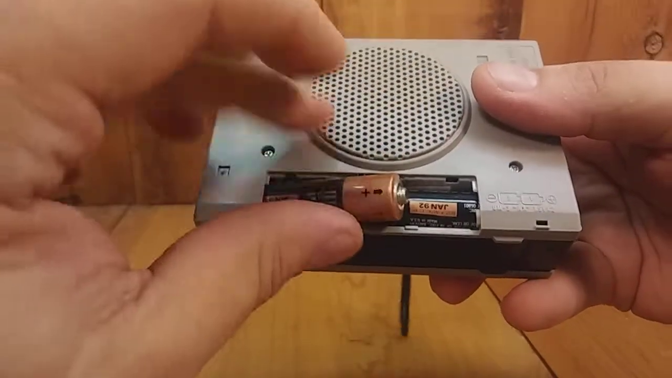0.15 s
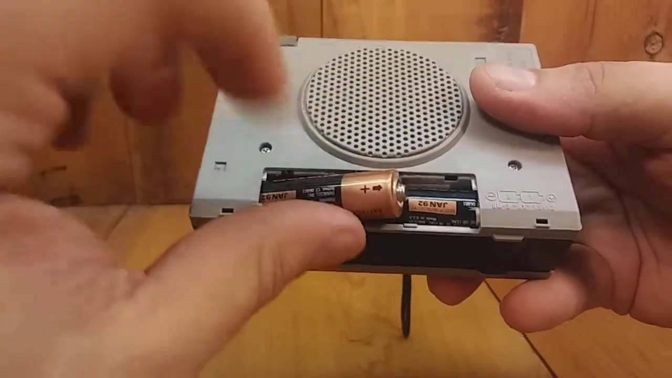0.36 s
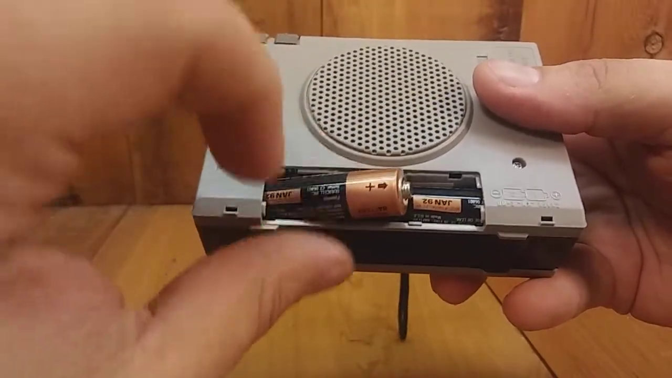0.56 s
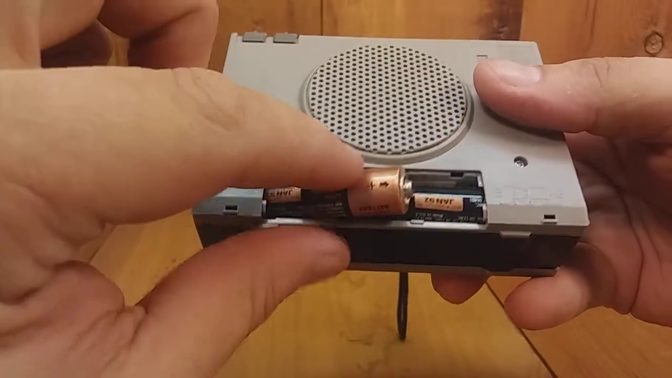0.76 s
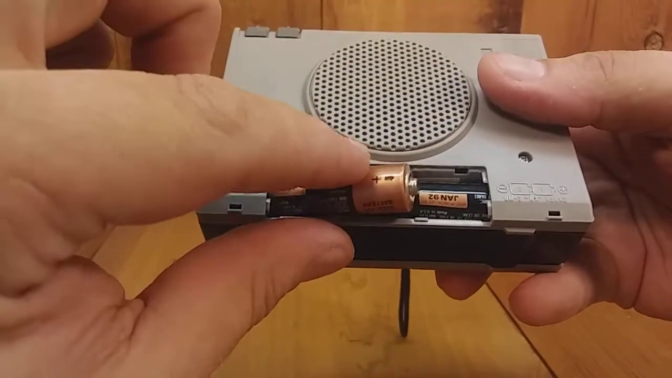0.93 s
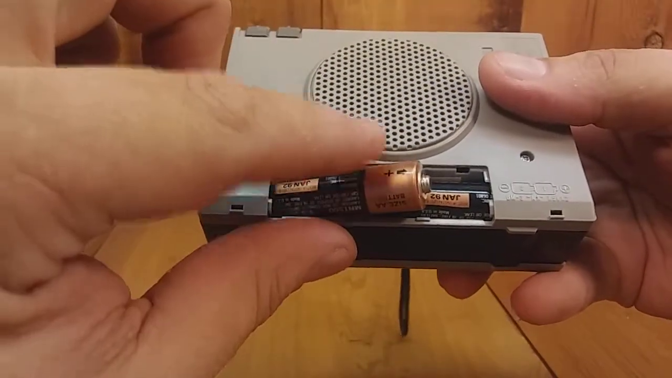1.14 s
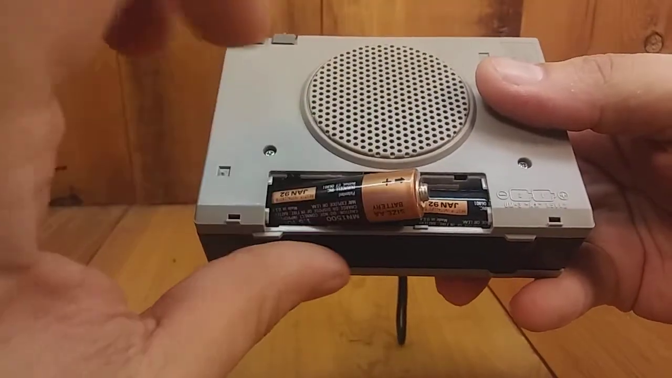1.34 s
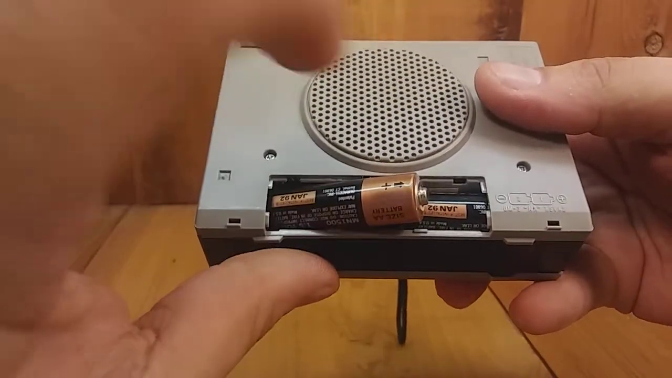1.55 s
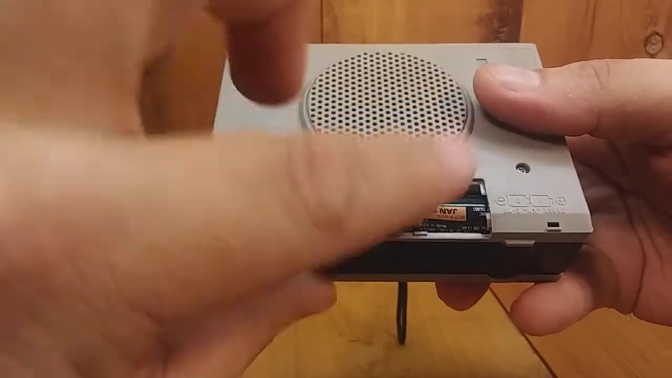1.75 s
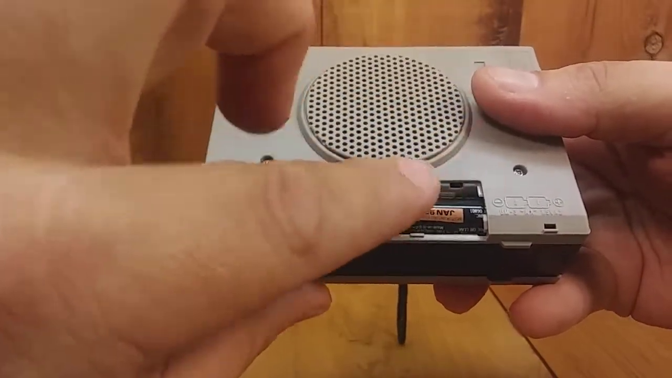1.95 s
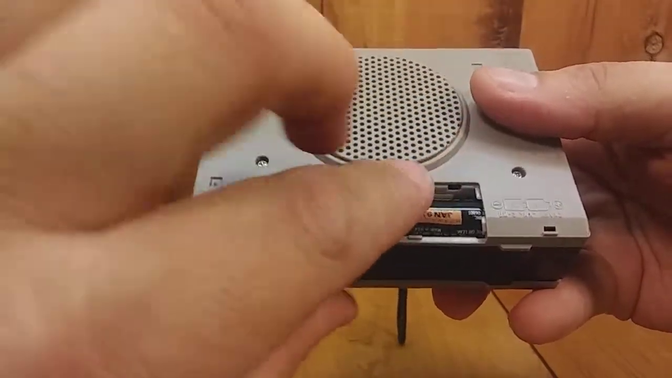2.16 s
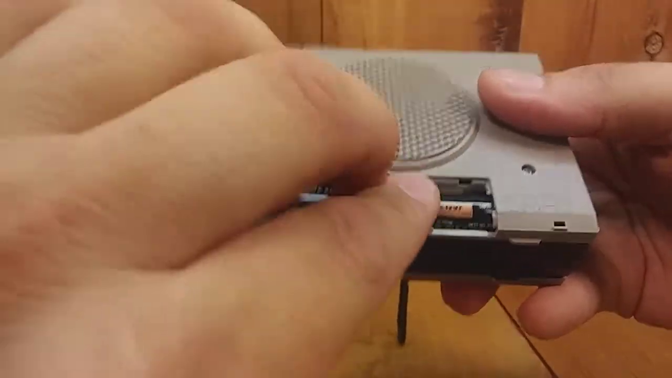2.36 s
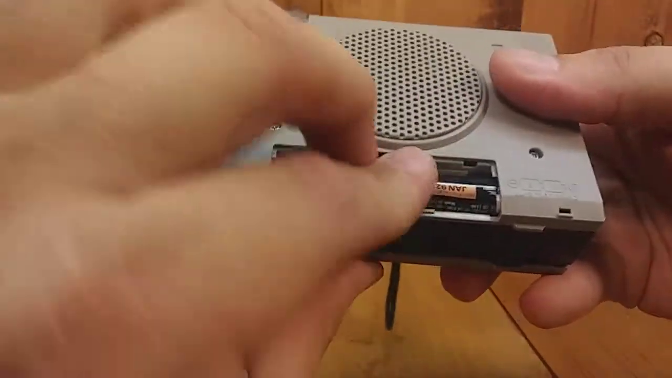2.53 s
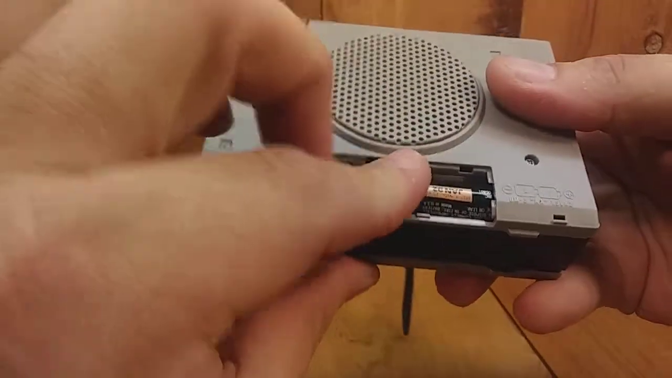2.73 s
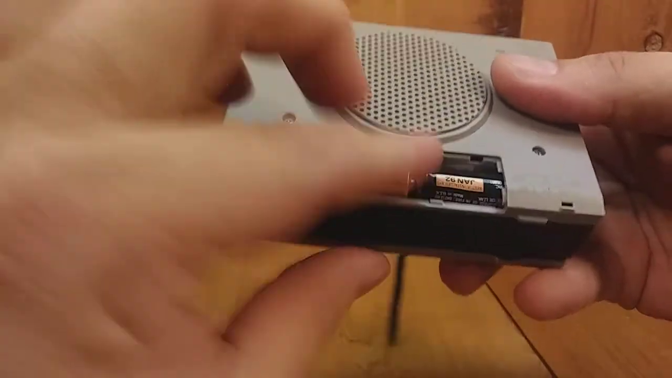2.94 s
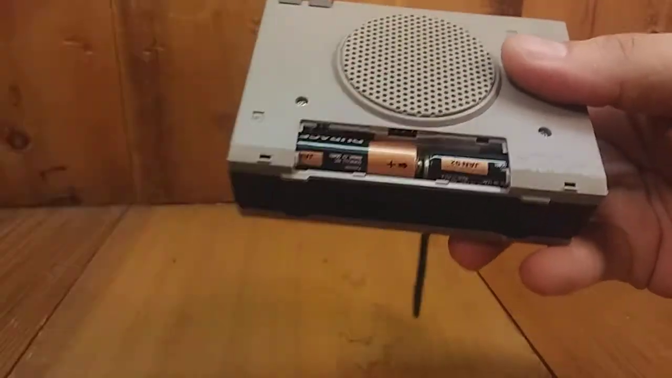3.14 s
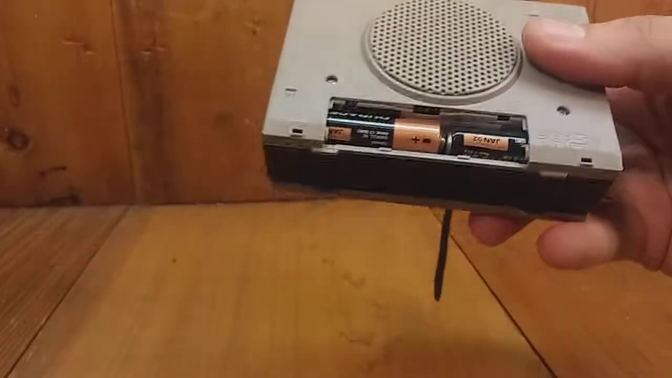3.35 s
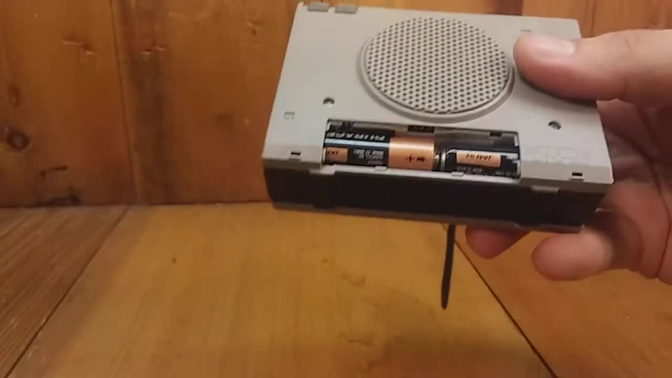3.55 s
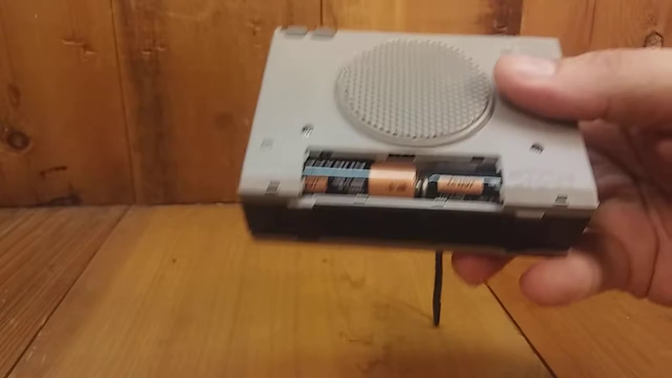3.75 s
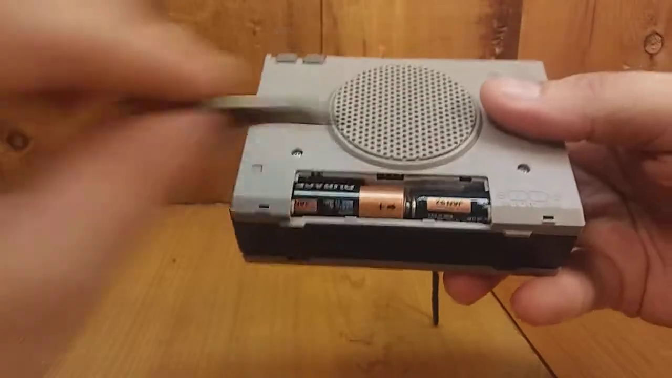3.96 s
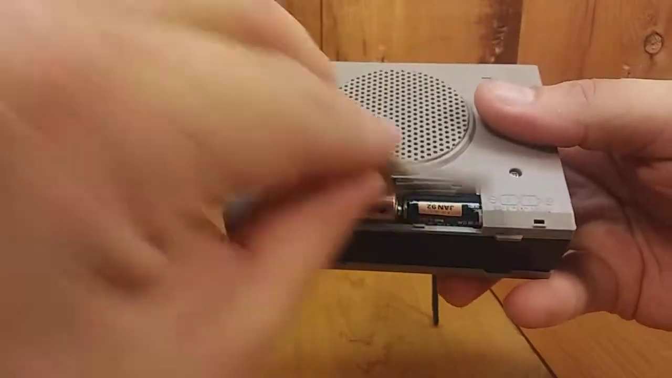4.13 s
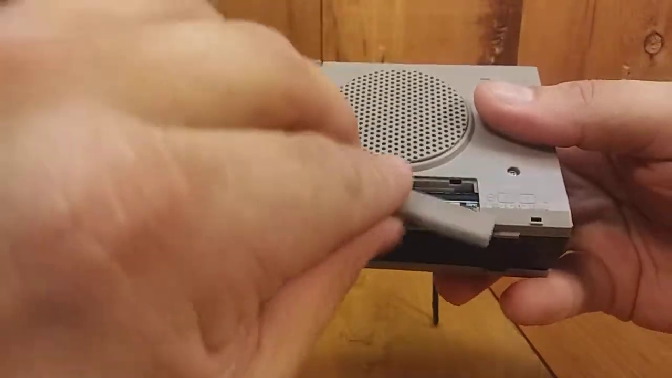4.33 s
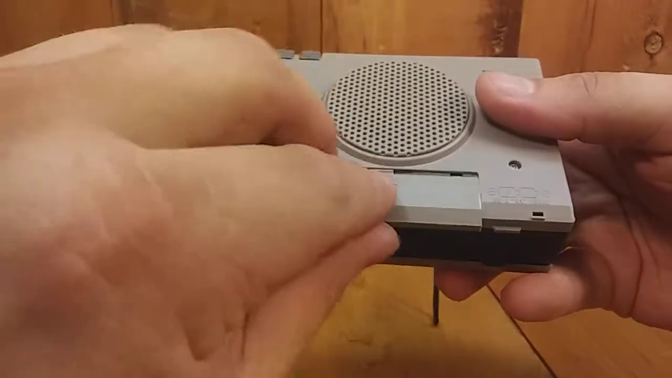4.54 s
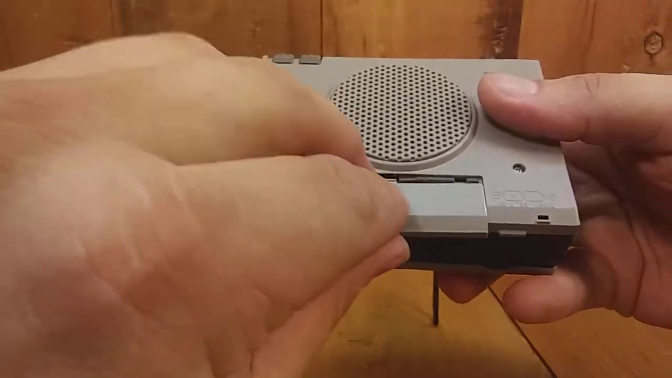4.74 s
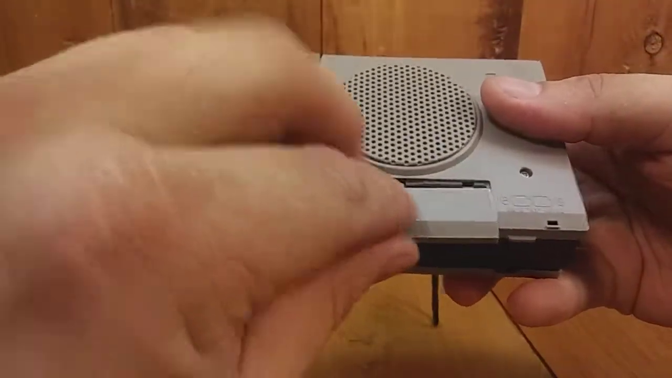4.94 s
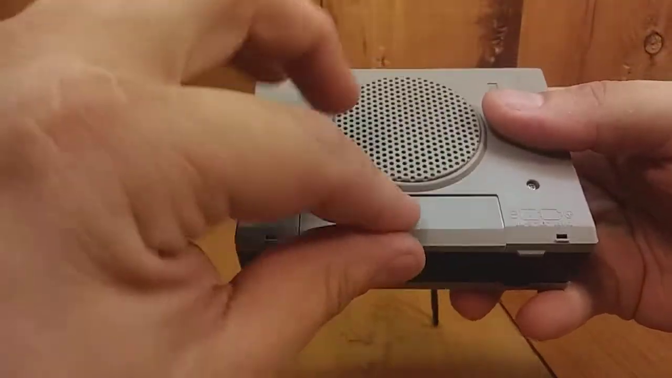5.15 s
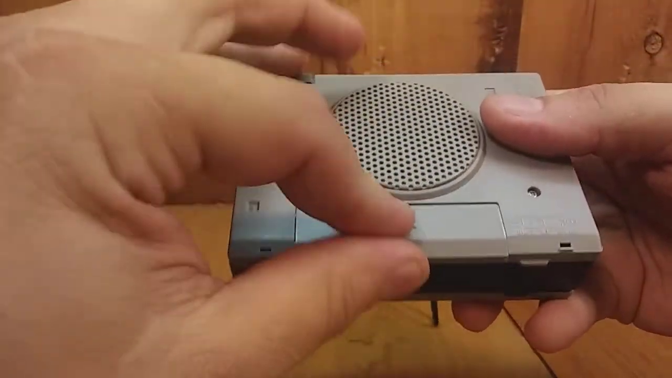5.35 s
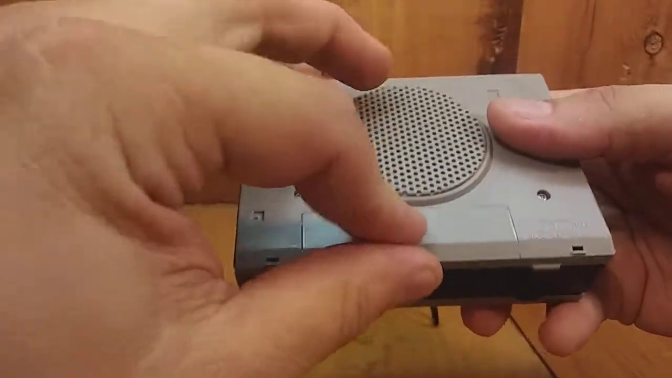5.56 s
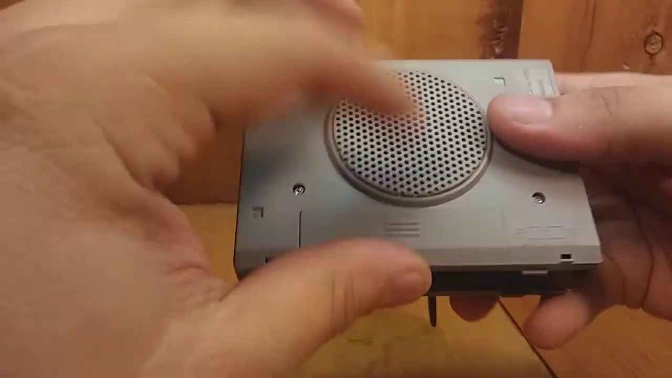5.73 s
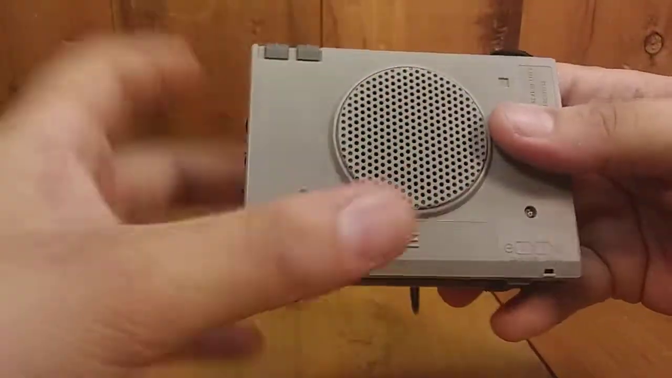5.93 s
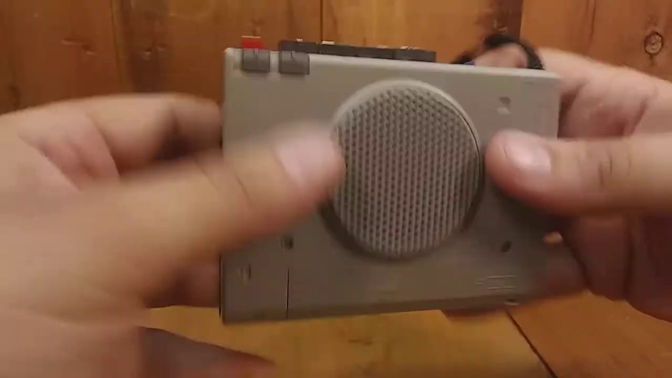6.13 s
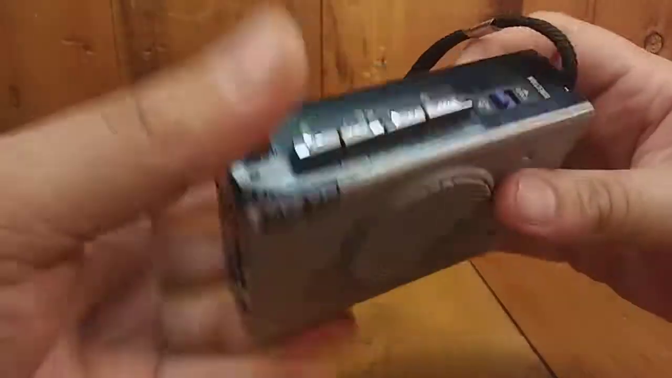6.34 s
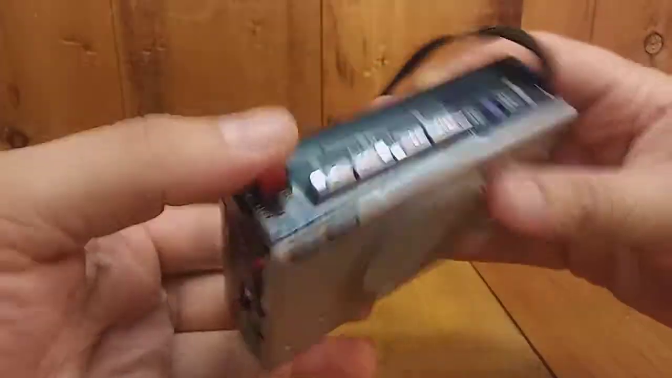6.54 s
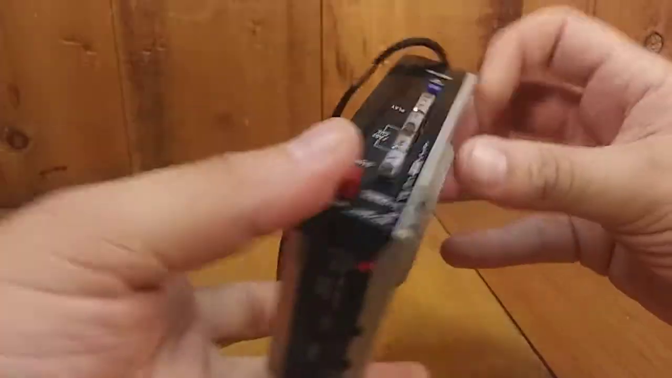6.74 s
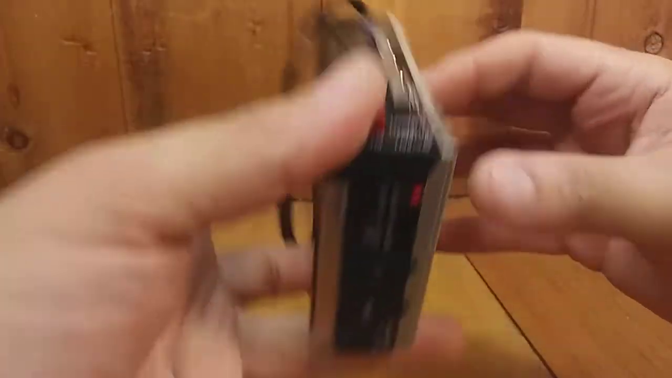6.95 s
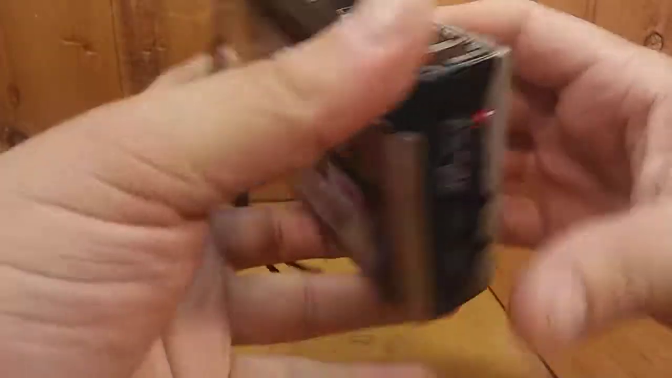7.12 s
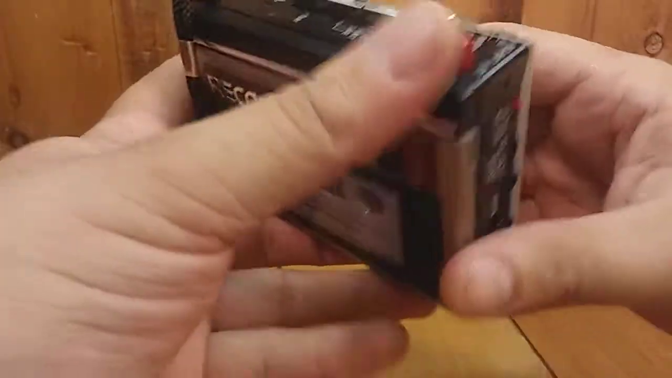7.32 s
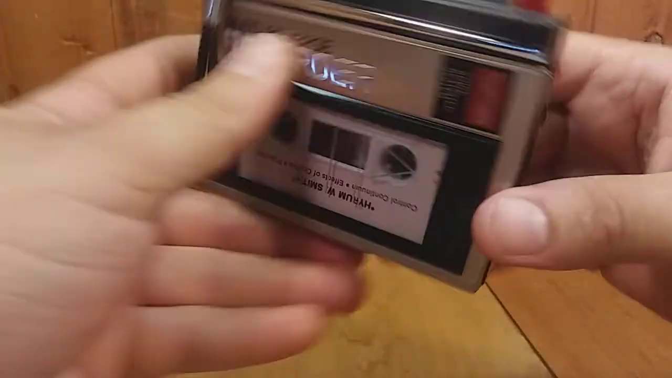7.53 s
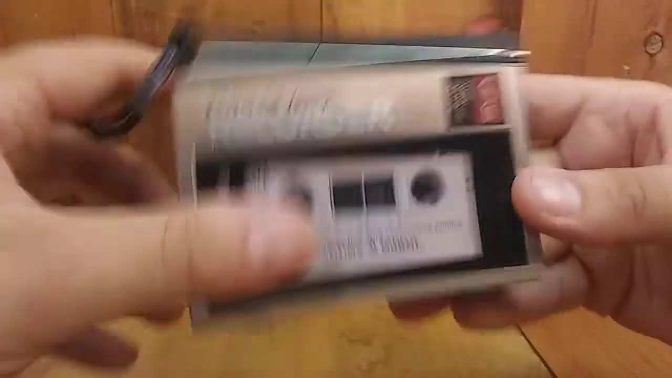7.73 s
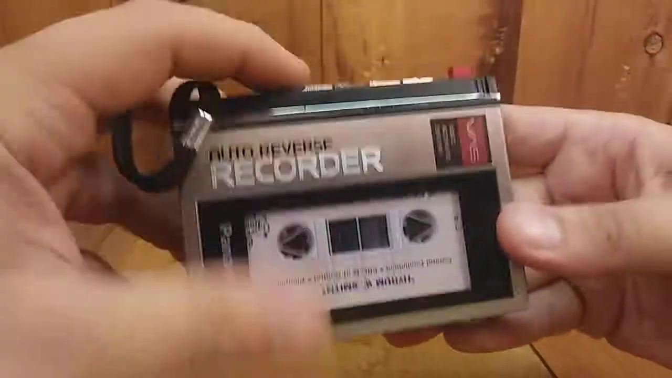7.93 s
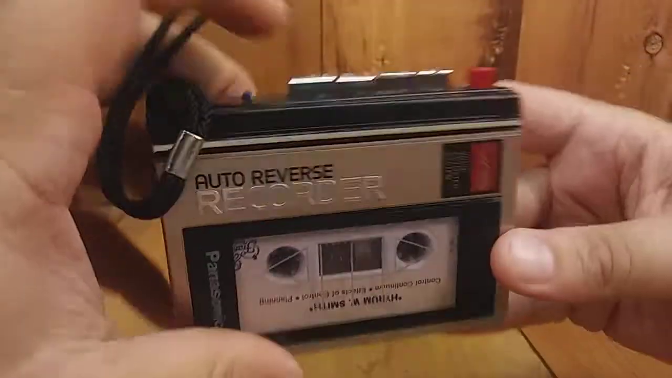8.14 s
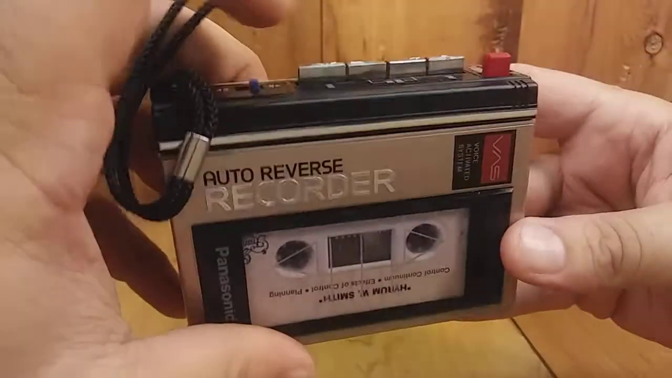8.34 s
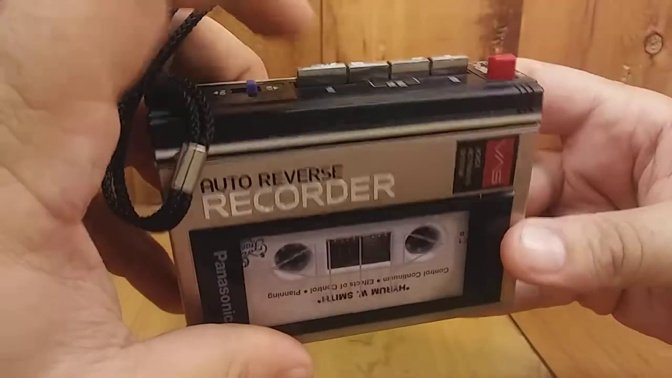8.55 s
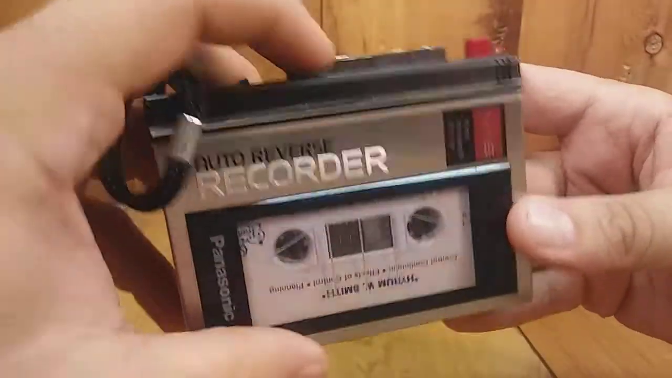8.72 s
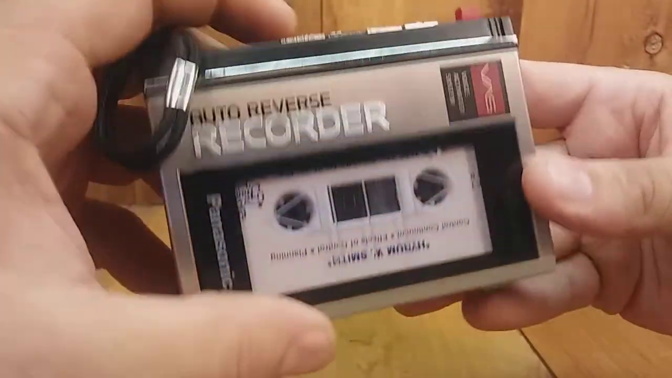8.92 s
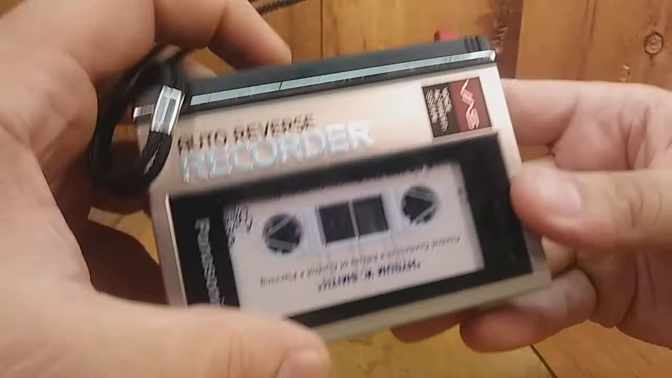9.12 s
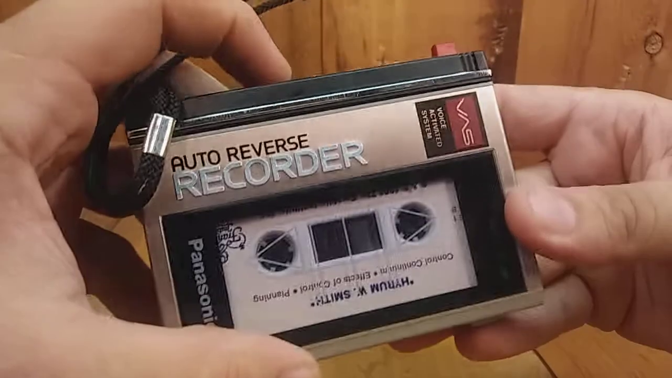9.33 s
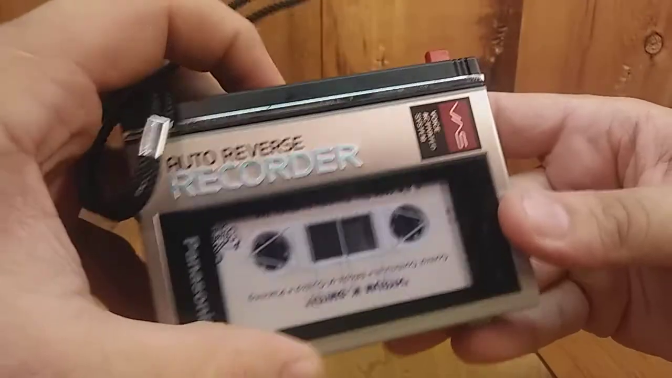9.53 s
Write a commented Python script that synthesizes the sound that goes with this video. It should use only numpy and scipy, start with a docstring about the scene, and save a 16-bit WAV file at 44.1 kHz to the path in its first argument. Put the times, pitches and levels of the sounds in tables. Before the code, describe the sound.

Batteries click into a small plastic tape recorder, a lid snaps shut, then handling taps and scuffs follow over faint hum and whine.

```python
"""Close up in a small wooden room, hands press cells into the battery bay of a small plastic tape
recorder, snap the lid on, then turn the case over. Clicks and knocks ring the shell from the start;
from about 3 s jolts thump it, and lighter taps and finger scuffs fill the last seconds.
Throughout, the room hums faintly and a thin electric whine switches on and off 60 times a second."""
import sys
import numpy as np
from scipy import signal
from scipy.fft import rfft, irfft, next_fast_len
from scipy.io import wavfile
from scipy.ndimage import map_coordinates

SR = 44100
rng = np.random.default_rng(int(sys.argv[2]) if len(sys.argv) > 2 else 0)


def wrap_up_sound(samples):
    """Save the sound to the file named by the first command line argument, as 16-bit audio."""
    columns = np.atleast_2d(samples).T
    # keep every value between -1 and 1, then stretch to whole-number steps
    tamed = np.clip(columns, -1, 1)
    steps = np.round(tamed * 32767).astype(np.int16)
    wavfile.write(sys.argv[1], SR, steps)


N = 422478

# Blows: start_s, thud_db, knock_db, click_db, sizzle_db, low_ring_hz, high_ring_hz, crack_db, t60_ms
CONTACTS = [(0.0, -42.5, -40.5, -39, -55, 826, 5720, 0, 70), (0.019, -67, -48, -41, -60, 1220, 2480, 7, 33),
            (0.0278, -65, -48, -50, -68, 820, 6270, 0, 30),
            (0.746, -55.5, -51.5, -53, -85, 650, 2200, 0, 110),
            (1.789, -47, -47, -66, -68, 1660, 6980, -2, 40),
            (1.807, -49, -44.5, -45.5, -46, 1820, 6450, -6, 107),
            (1.8618, -52, -49, -55, -60, 1000, 5600, 11, 71),
            (1.933, -66, -64, -59, -69, 1760, 2480, 6, 45),
            (2.0173, -58, -47.5, -61, -65, 990, 2120, 4, 53),
            (2.129, -64, -63, -56, -66, 1000, 3000, 0, 30),
            (2.1468, -39, -35.5, -37, -44.5, 1770, 2550, 8, 74),
            (2.1868, -49, -48, -49, -57, 1630, 5490, -12, 51),
            (2.191, -43, -30.5, -24.5, -36, 1650, 5320, 10.5, 62),
            (2.318, -46, -46.5, -39, -44.5, 990, 6520, 11, 45),
            (2.4477, -63, -50.5, -44, -65, 825, 3000, 13, 42),
            (2.5935, -56.5, -46, -60, -70, 1250, 2020, 9, 48),
            (2.765, -60, -55, -62, -70, 1440, 2310, -10, 45),
            (3.0662, -23, -30, -28, -22.5, 1130, 6800, -17, 60),
            (3.0699, -31, -24, -29, -27.5, 1090, 7200, -14, 19),
            (3.4977, -38, -41, -30, -50, 1310, 3440, -2, 45),
            (3.5006, -30, -38, -20.5, -33, 1310, 5100, -9, 35),
            (3.5041, -32.5, -28.5, -25, -32, 1660, 5000, -1, 65),
            (3.5335, -49, -27.5, -39, -48, 1550, 5490, -17, 38),
            (3.6207, -49, -57, -44, -58, 1000, 6700, 0, 43),
            (4.1528, -51, -39, -31.5, -34.5, 2230, 2870, -1, 70),
            (4.234, -65, -47, -49, -66, 1450, 3070, 4, 45), (4.353, -56, -51, -38, -78, 1410, 3130, 11, 52),
            (4.4083, -71, -38, -30, -50, 1210, 6090, -12, 44),
            (4.41, -63, -38, -32, -32.5, 1230, 6090, 3, 43),
            (4.4249, -51, -46, -38, -56, 1820, 3490, 10, 37),
            (4.4537, -65, -38.5, -34, -40, 1910, 2500, 6, 66),
            (4.4668, -66, -44, -45, -56, 1820, 2380, -1, 45),
            (4.4908, -56, -47, -40, -61, 1840, 2350, 4, 33),
            (5.0818, -59, -57, -41, -66, 1100, 6300, 5, 66),
            (5.0891, -42, -35.5, -24, -39.5, 1084, 5750, 10.5, 55),
            (5.1414, -47.5, -43.5, -52.5, -59, 806, 2480, 12, 65),
            (5.2804, -59, -48.5, -54, -57, 990, 1990, 1, 59),
            (5.349, -56, -55, -43, -61, 1700, 3930, 7, 45),
            (5.3791, -55, -49.5, -45, -64, 1790, 3570, 10, 45),
            (5.4131, -62, -28.5, -20, -49, 1120, 5100, -10, 34),
            (5.4175, -40, -30, -16, -17.5, 1110, 5700, 10, 21),
            (5.4214, -62, -29, -18, -30, 1800, 3500, 9.5, 40),
            (5.4246, -40, -31, -16, -39, 800, 6140, -9, 27), (5.596, -68, -54, -62, -70, 950, 2600, 6, 45),
            (5.6223, -67, -52, -51, -52, 990, 6150, 7, 34), (5.6494, -53, -42, -43, -69, 960, 3820, 13, 47),
            (5.7353, -44.5, -43.5, -55, -61, 1030, 3790, 11, 44),
            (5.7929, -58, -67, -58, -61, 990, 6090, 8, 52), (5.99, -57, -58, -55, -66, 970, 2210, -5, 45),
            (6.1798, -49.5, -45, -48.5, -56, 1120, 2410, 6, 87),
            (6.3802, -61, -53, -53, -70, 1220, 2680, -3, 45),
            (6.457, -49, -44, -56, -63, 1450, 2900, 12, 47), (6.514, -56, -46, -51, -67, 1440, 4910, 2, 66),
            (6.5261, -51, -33, -28.5, -35, 1430, 4660, 8.5, 45),
            (6.731, -68, -51, -69, -70, 1450, 1980, 10, 45),
            (6.795, -53, -45, -55, -55, 1843, 1890, 10, 53),
            (7.147, -47, -39.5, -48, -67, 1420, 5310, 7.5, 67),
            (7.153, -45.5, -54, -40.5, -54, 980, 2470, 7, 54),
            (7.2518, -50, -37.5, -43.5, -50, 1300, 2140, 9, 48),
            (7.435, -60, -53, -64, -60, 1410, 2510, 2, 49),
            (7.5435, -73, -49.5, -47, -66, 1110, 2350, -2, 41),
            (7.6611, -62, -42, -42, -38, 1410, 5500, -9, 77),
            (7.7494, -67, -50, -52, -66, 1440, 2580, 4, 45),
            (7.8006, -57, -50.5, -50, -51, 1410, 6030, 6, 44),
            (7.9861, -56, -43, -32, -43, 1120, 3320, 7.5, 43),
            (8.733, -73, -52.5, -49, -66, 1870, 2200, 12, 53),
            (8.8665, -58, -42, -31.5, -48.5, 1840, 3240, 7.5, 75),
            (9.141, -76, -49, -59, -68, 1660, 2430, 0, 45), (9.2447, -53, -43, -54, -72, 1410, 2360, 5, 45),
            (9.3042, -57, -42, -54, -55, 1460, 5760, -3, 45),
            (9.3165, -60, -39, -33.5, -45, 1440, 7010, 1, 63),
            (9.3284, -45, -43, -43, -40, 1440, 6030, 1, 40),
            (9.3479, -47, -30.5, -41, -50, 1420, 2400, 6, 61),
            (9.3513, -42, -29, -31, -47, 1500, 2380, 4, 58),
            (9.357, -40.5, -38, -29, -29.5, 1870, 6500, 4, 64),
            (9.5133, -51.5, -53, -61, -70, 970, 6960, 7, 51),
            (9.5643, -53, -52, -44.5, -75, 1300, 2420, -3, 63),
            (9.574, -57, -47, -55, -68, 1290, 2430, 2, 45)]
# Centres of thud, knock, click, sizzle: centre_hz
PARTS_HZ = [600, 1700, 4400, 11300]
# Contact bands: low_hz, high_hz
CONTACT_BANDS = [(150, 450), (450, 900), (900, 1800), (1800, 2800), (2800, 4200), (4200, 8000),
                 (8000, 16000)]
# Room decay per contact band: t60_s
ROOM_T60_S = [0.47, 0.24, 0.16, 0.17, 0.18, 0.18, 0.15]


def contacts():
    """Each blow sends a crack and a short rattle through the shell; the room decays band by band."""
    bass_fall_db_per_oct, plastic_cutoff_hz = 9.9, 14900
    out, t = np.zeros(N + SR), np.arange(SR // 3) / SR
    filters, band_oct = bandpasses(CONTACT_BANDS), octaves(CONTACT_BANDS)
    echo_onset = np.clip(t / 0.0018, 0, 1)
    for start_s, *parts_db, low_ring_hz, high_ring_hz, crack_db, t60_ms in CONTACTS:
        levels_db = np.interp(band_oct, np.log2(PARTS_HZ), parts_db)
        levels_db -= bass_fall_db_per_oct * np.clip(np.log2(PARTS_HZ[0]) - band_oct, 0, None)
        rattle = amp(-0.5 - 60 * 1000 * t / t60_ms) * (1 - np.exp(-t / 0.00043))
        crack = amp(crack_db - 60 * t / 0.004)
        lift_db = rng.normal(0, 1.0, len(SHELL_MODES))
        lift_db += mode_lift(low_ring_hz, 9.0) + mode_lift(high_ring_hz, 5.5)
        near, far = rng.standard_normal((2, len(t)))
        bumps = amp(2.3 * np.repeat(rng.standard_normal(len(t) // 30), 30))  # loose parts and walls
        near, far = unit(near * bumps), unit(far * bumps[::-1])
        near[:44] = unit(near[:44])  # first 1 ms at full strength
        blow = 0
        for sos, db, room_t60_s, (low_hz, _) in zip(filters, levels_db, ROOM_T60_S, CONTACT_BANDS):
            direct = near * (rattle + crack * np.clip(low_hz / 2600, 0, 1))
            echo = far * echo_onset * amp(-9.0 - 60 * t / room_t60_s)
            band_rms = np.std(signal.sosfilt(sos, far))
            blow += amp(db) / band_rms * signal.sosfilt(sos, direct + echo)
        rung = filtered(blow, lambda hz: shell(hz, -4.0, lift_db) / (1 + 1j * hz / plastic_cutoff_hz)**2)
        out[round(start_s * SR):][:len(t)] += rung
    return out[:N]


# Shell resonances: mode_hz, width_hz, gain_db
SHELL_MODES = [(242, 140, -14), (263, 170, -13), (447, 210, -4), (710, 27, -15), (804, 46, 1),
               (1009, 23, 6), (1110, 70, 1), (1270, 44, -1), (1408, 107, -1.5), (1682, 29, -9),
               (1940, 86, -10), (2207, 132, -1.5), (2434, 68, -4.5), (2653, 95, -15), (3140, 56, -7),
               (3440, 114, 0), (3725, 57, -3), (5000, 420, -6.5), (5650, 910, -1), (6100, 310, 0.5),
               (6560, 210, -2), (7070, 300, 0.5), (11320, 230, -1)]


def shell(hz, flat_db, lift_db):
    """Response of the thin shell: it radiates everything a little and its modes more."""
    modes = (amp(db + lift) * 1j * hz * width_hz / (mode_hz**2 - hz**2 + 1j * hz * width_hz)
             for (mode_hz, width_hz, db), lift in zip(SHELL_MODES, lift_db))
    return amp(flat_db) + sum(modes)


def mode_lift(ring_hz, target_db):
    """Lift in dB per mode: the place of a touch pulls modes near one pitch toward one level."""
    mode_hz, _, gain_db = np.transpose(SHELL_MODES)
    return (target_db - gain_db) * np.exp(-(np.log(mode_hz / ring_hz) / 0.07) ** 2)


# Jolts: start_s, level_db, pitch_hz, t60_s
THUMPS = [(3.068, -28, 250, .13), (3.429, -51, 109, .15), (3.511, -45, 360, 0.14), (3.621, -47, 360, .08),
          (5.416, -44, 109, 0.024), (5.42, -43, 352, .08), (6.513, -54.5, 280, 0.053),
          (6.535, -48, 290, .06), (6.922, -48.5, 332, .08)]


def thumps():
    """A jolt of the whole case pushes out low noise around one pitch; the room booms after it."""
    out, t = np.zeros(N + SR), np.arange(SR // 3) / SR
    for start_s, level_db, pitch_hz, t60_s in THUMPS:
        sos, = bandpasses([(0.59 * pitch_hz, 1.5 * pitch_hz)])
        push = rng.standard_normal(len(t))
        decay = amp(-60 * t / t60_s) + amp(-10 - 60 * t / ROOM_T60_S[0])
        gain = amp(level_db) / np.std(signal.sosfilt(sos, push))
        out[round(start_s * SR):][:len(t)] += gain * signal.sosfilt(sos, push * decay)
    return out[:N]


# Slides of skin and plastic: start_s, length_s, level_db, tilt_db_per_oct, ring_hz
SCUFFS = [(0, 0.05, -55, 2.5, 2450), (2.301, 0.026, -42.5, 3, 2210), (3.145, 0.097, -52.5, -3, 980),
          (3.4, 0.046, -70, -6, 1020), (3.454, 0.058, -58, -2, 1020), (3.613, 0.037, -55, 2, 6640),
          (4.227, 0.094, -64, 3.5, 2620), (4.292, 0.045, -59.5, 4.5, 2650), (4.428, 0.041, -50, 2.5, 5350),
          (4.459, 0.046, -50.5, 0.5, 2460), (5.055, 0.037, -54.5, 1, 6680), (5.59, 0.028, -68, 0, 2490),
          (5.62, 0.027, -53.5, 1.5, 6260), (5.724, 0.02, -56.5, 3, 1030), (6.14, 0.04, -58.5, 6, 1430),
          (6.408, 0.036, -62, -1, 790), (6.537, 0.058, -56.5, 3, 3780), (6.897, 0.05, -67, -4, 770),
          (6.936, 0.06, -64, 3, 2450), (7.032, 0.035, -68, 0, 1590), (7.094, 0.075, -60.5, 0.5, 1010),
          (7.204, 0.038, -63, -1, 1000), (7.32, 0.11, -59, 2, 2540), (7.42, 0.05, -59, 2, 1360),
          (7.508, 0.055, -63, 3.5, 2350), (7.589, 0.11, -60.5, 1, 1420), (7.66, 0.06, -52.5, 2, 5400),
          (7.742, 0.052, -60.5, -1.5, 6900), (7.956, 0.031, -66, -1, 3350), (9.127, 0.033, -65, -2, 2430),
          (9.296, 0.036, -50.5, -0.5, 1460), (9.319, 0.025, -47, 4, 1430), (9.5, 0.056, -64, -2, 970)]
# Scuff bands: low_hz, high_hz
SCUFF_BANDS = [(150, 900), (900, 2800), (2800, 8000), (8000, 16000)]
# Colour per scuff band: offset_db
SCUFF_COLOUR_DB = [-4, 0.5, -4, -16.5]


def scuffs():
    """A sliding touch swells and fades as it sticks and slips, ringing the shell's modes."""
    out, slips = np.zeros(N), unit(amp(1.96 * wobble(90) + 2.4 * wobble(500)))
    filters, band_oct = bandpasses(SCUFF_BANDS), octaves(SCUFF_BANDS)
    for start_s, length_s, level_db, tilt_db_per_oct, ring_hz in SCUFFS:
        levels_db = level_db + tilt_db_per_oct * (band_oct - band_oct[1]) + SCUFF_COLOUR_DB
        first = round(start_s * SR)
        t = np.arange(round(length_s * SR) + SR // 12) / SR
        swell = np.sin(np.pi * np.clip(t / length_s, 0, 1)) ** 1.15 * np.resize(slips[first:], len(t))
        swell += amp(-6.5) * signal.lfilter([.0012], [1, -.9988], swell)  # room tail
        grain = rng.standard_normal(SR // 4)
        friction = sum(amp(db) * unit(signal.sosfilt(sos, grain))[-len(t):]
                       for sos, db in zip(filters, levels_db))
        lift_db = rng.normal(0, 4.4, len(SHELL_MODES)) + mode_lift(ring_hz, 9.0)
        rung = filtered(friction * swell, lambda hz: shell(hz, -5.0, lift_db))
        out[first:first + len(t)] += rung[:N - first]
    return out


# Grip shifts, one list each: time_s, relative_db
GRIP_SHIFTS = [
    [(1.7, -52), (2.238, -69), (2.296, -60), (2.8, -73)],
    [(4.15, -57), (4.34, -48.5), (4.65, -61)],
    [(4.95, -74), (5.41, -57), (5.95, -61), (6.46, -54.5), (6.6, -58), (7.29, -50.5), (7.45, -50),
     (7.61, -52.5), (8.1, -63)],
    [(9.256, -73), (9.45, -55), (9.58, -60)],
]
# Skin friction spectrum: freq_hz, density_db
SKIN_SPECTRUM = [(300, -6.5), (1000, -3), (1500, -6), (2400, -4), (4000, -6.5), (7000, -15.5), (9000, -18),
                 (15000, -19)]


def grip_rub():
    """The holding hand shifts and rustles faintly on the shell."""
    points = []
    for shift in GRIP_SHIFTS:
        points += [(shift[0][0] - .05, -90), *shift, (shift[-1][0] + .05, -90)]
    friction = unit(amp(2.7 * wobble(25)) * noise(SKIN_SPECTRUM))
    rustle = amp(curve(points) - 8.5) * friction
    return filtered(rustle, lambda hz: shell(hz, -4.5, np.full(len(SHELL_MODES), -1.5)))


def whine():
    """Each electric switching cycle: a sharp blip, a tone of slightly new pitch and phase, a rest."""
    switch_hz, tone_hz, blip_hz = 59.9975, 7650, 6800
    turns = np.arange(N) / SR * switch_hz - .118
    cycle = np.floor(turns).astype(int) + 1
    age_s = turns % 1 / switch_hz
    kick, drift = rng.standard_normal((cycle.max() + 1, 2))[cycle].T
    phase = 2 * np.pi * ((tone_hz + 14 * drift) * age_s + 0.14 * kick + 0.15 * wobble(150))
    gate = np.clip((age_s - .0009) / 0.00013, 0, 1) * np.clip((.0124 - age_s) / 0.00016, 0, 1)
    tone = gate * (np.sin(phase) + amp(-18) * np.sin(2 * phase))
    blip = np.exp(-((age_s - .00042) / .0002) ** 2) * np.sin(2 * np.pi * blip_hz * age_s)
    return amp(-56.0 + 0.42 * wobble(200)) * (tone + amp(5.0 + 2.7 * kick) * blip)


# Room rumble spectrum: freq_hz, density_db
RUMBLE_SPECTRUM = [(18, -59), (30, -10), (50, -12), (71, -0.5), (86, -15), (118, 0.5), (148, -9), (217, -8),
                   (298, -9.5), (381, -8.5), (500, -10.5), (559, -11.5), (1260, -15.5), (6500, -28),
                   (8450, -41), (14300, -120)]
# Far drone envelope: time_s, level_db
DRONE_LEVELS = [(3.3, -77), (3.5, -53), (3.74, -72.5), (4.28, -68), (5.23, -68.5), (5.55, -53), (5.72, -62),
                (6.06, -59.5), (6.19, -65.5), (6.72, -65), (7.12, -76.5), (8.46, -67), (9.22, -62.5),
                (9.58, -60)]
# Hiss spectrum: freq_hz, density_db
HISS_SPECTRUM = [(1500, -1), (4000, -3.5), (7000, -2.5), (9000, -8), (12000, -4.5), (15300, -1),
                 (17000, -3)]


def room_tone():
    """Far rumble, a narrow drone and microphone hiss."""
    rumble = amp(-59 + 0.6 * wobble(2.66)) * noise(RUMBLE_SPECTRUM)
    drone = amp(curve(DRONE_LEVELS)) * noise([(270, -19), (286, -26.5), (303, -10)])
    hiss = amp(-64.0) * noise(HISS_SPECTRUM)
    return rumble + drone + hiss


def amp(db):
    """dB to gain."""
    return 10 ** (np.asarray(db) / 20)


def unit(x):
    """x at rms 1."""
    return x / np.sqrt(np.mean(x ** 2) + 1e-20)


def curve(points):
    """(time_s, value) points, interpolated per sample."""
    return np.interp(np.arange(N) / SR, *np.transpose(points))


def wobble(rate_hz):
    """Smooth random curve with knots at rate_hz."""
    knots = rng.standard_normal(int(N * rate_hz / SR) + 4)
    return map_coordinates(knots, [np.arange(N) * rate_hz / SR])


def filtered(x, response):
    """x through a complex frequency response."""
    n = x.shape[-1]
    size = next_fast_len(n + 8192)
    return irfft(rfft(x, size) * response(np.fft.rfftfreq(size, 1 / SR)), size)[..., :n]


def noise(spectrum):
    """Noise at rms 1, shaped by (freq_hz, density_db) points."""
    freq_hz, db = np.transpose(spectrum)
    white = rng.standard_normal(N)
    return unit(filtered(white, lambda hz: amp(np.interp(np.log(hz + 1), np.log(freq_hz), db, -120, -120))))


def bandpasses(bands):
    """One steep band-pass per band."""
    return [signal.butter(3, band, "bandpass", fs=SR, output="sos") for band in bands]


def octaves(bands):
    """Band centres in octaves."""
    return np.log2(bands).mean(axis=1)


def scene():
    """All sources, summed to mono."""
    return (contacts() + thumps() + scuffs() + grip_rub() + room_tone() + whine())[None]


def record(dry):
    """The camera rounds the loudest peaks, thins the deepest bass and cuts the top of the band."""
    ceiling, bass_hz, top_hz = .9, 58, 15780
    rounded = dry / (1 + np.abs(dry / ceiling) ** 4) ** .25
    return filtered(rounded, lambda hz: (hz < top_hz) * np.clip(hz / bass_hz, 0, 1) ** 2.2)


dry = scene()
out = record(dry)
wrap_up_sound(out)
```